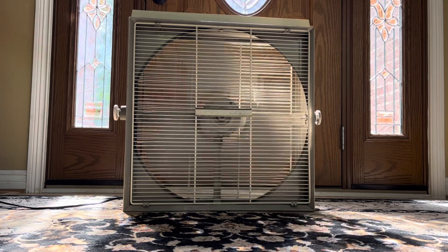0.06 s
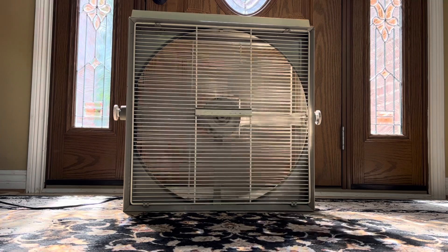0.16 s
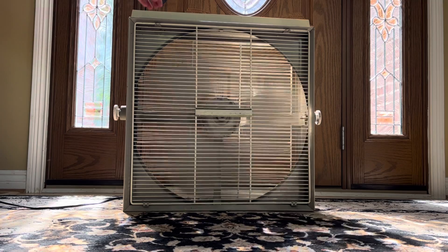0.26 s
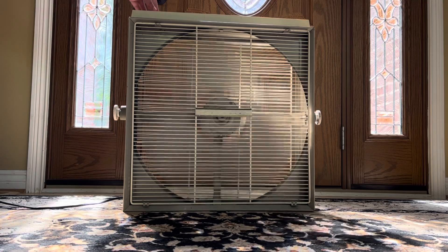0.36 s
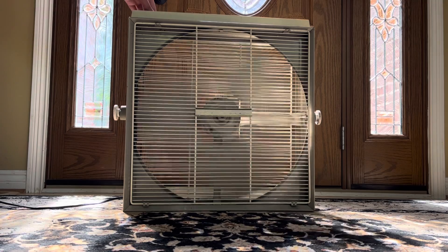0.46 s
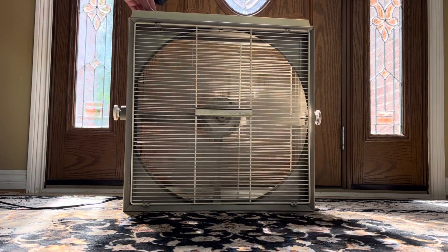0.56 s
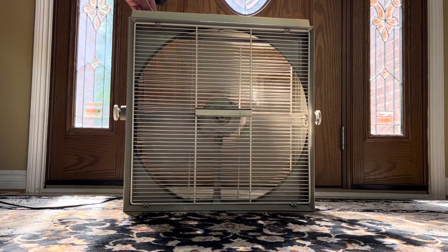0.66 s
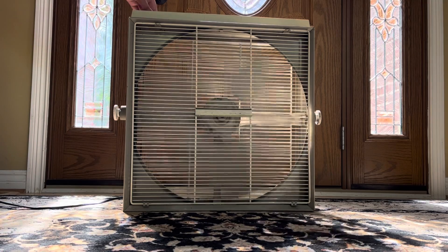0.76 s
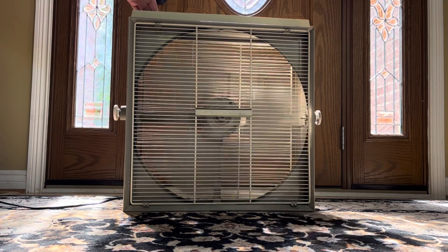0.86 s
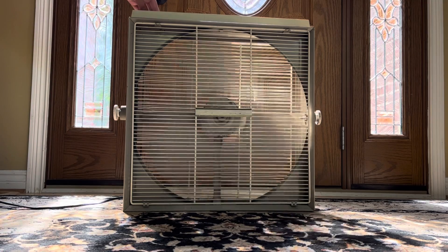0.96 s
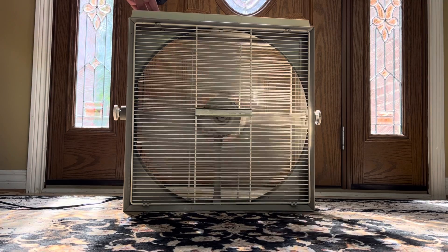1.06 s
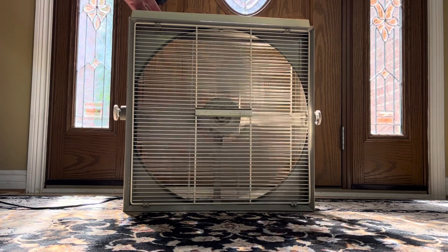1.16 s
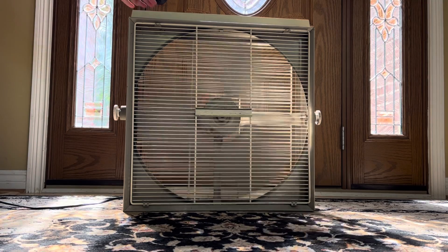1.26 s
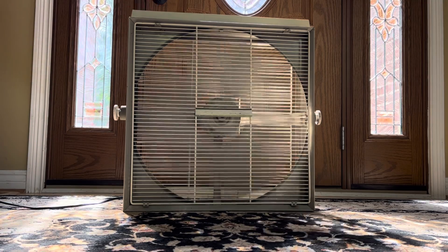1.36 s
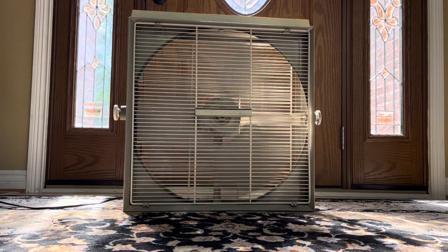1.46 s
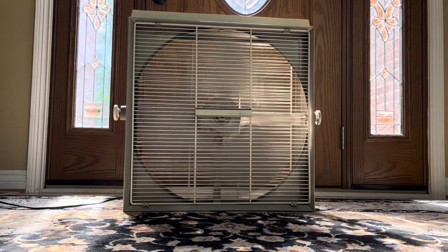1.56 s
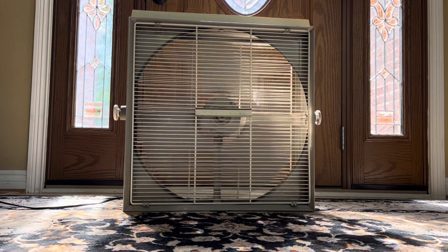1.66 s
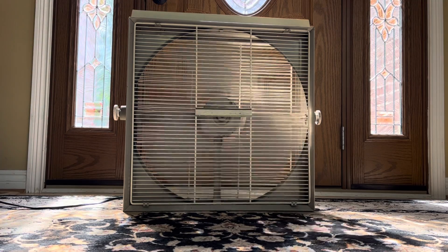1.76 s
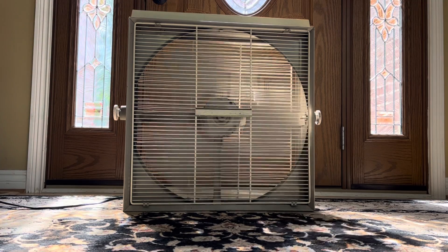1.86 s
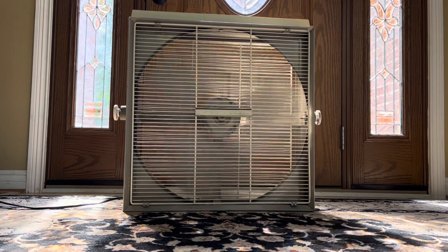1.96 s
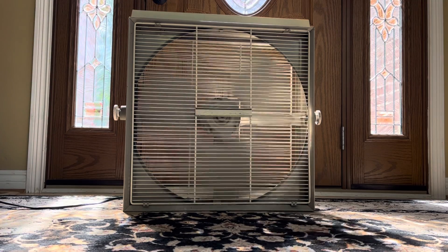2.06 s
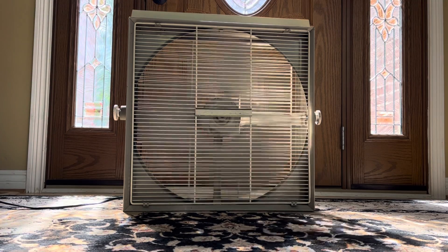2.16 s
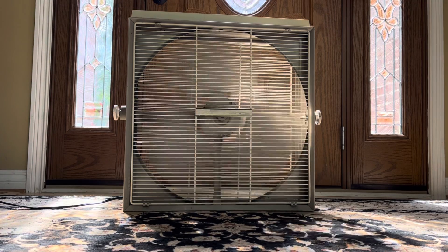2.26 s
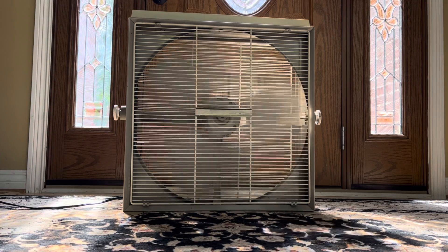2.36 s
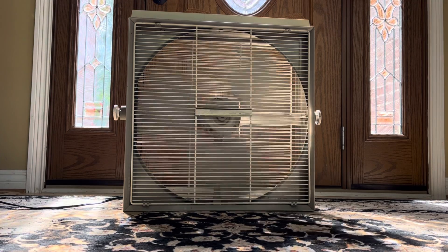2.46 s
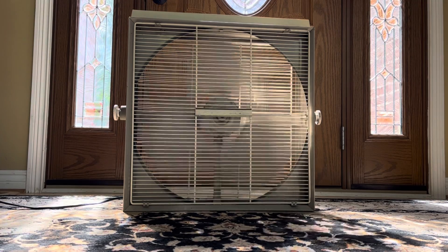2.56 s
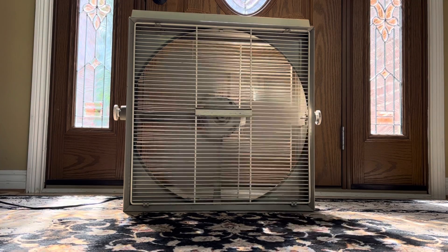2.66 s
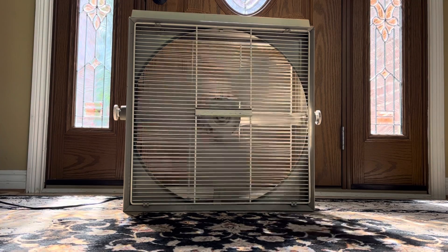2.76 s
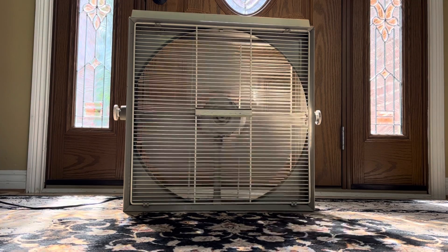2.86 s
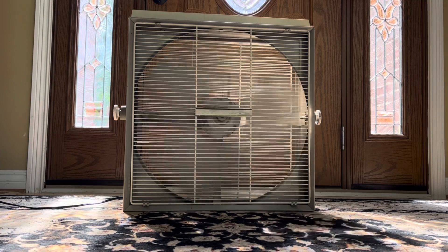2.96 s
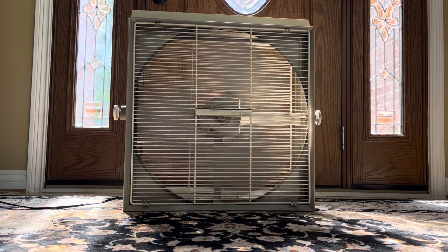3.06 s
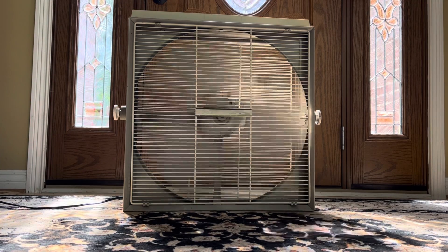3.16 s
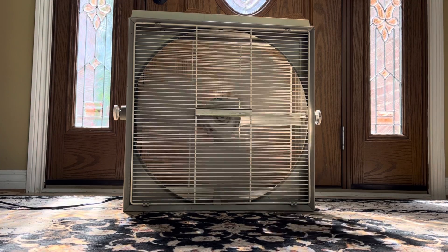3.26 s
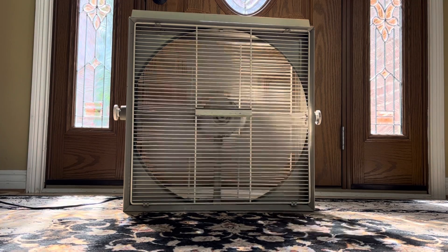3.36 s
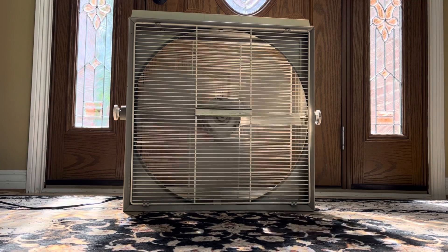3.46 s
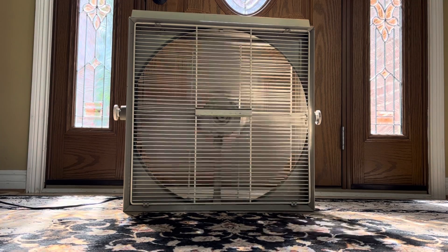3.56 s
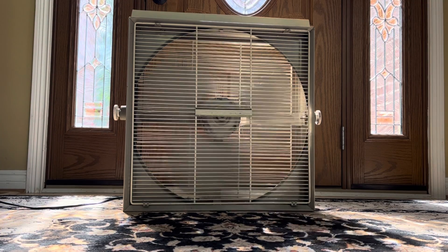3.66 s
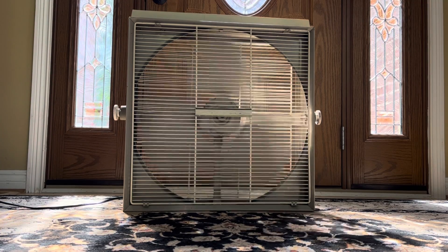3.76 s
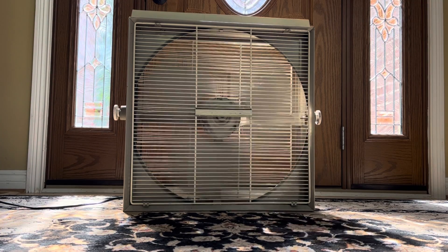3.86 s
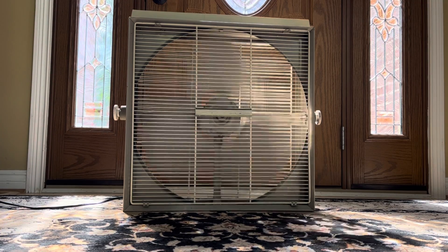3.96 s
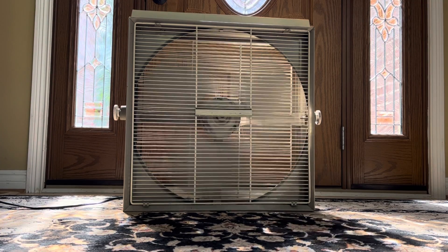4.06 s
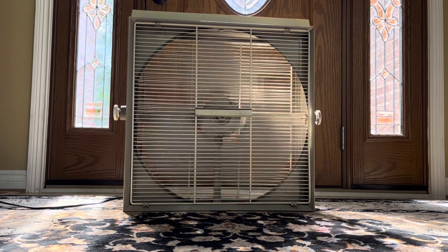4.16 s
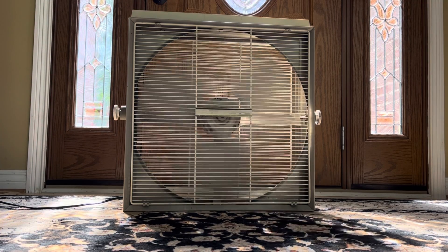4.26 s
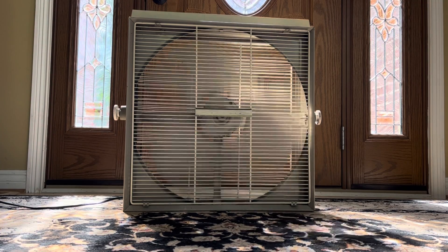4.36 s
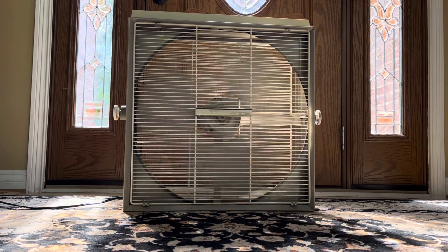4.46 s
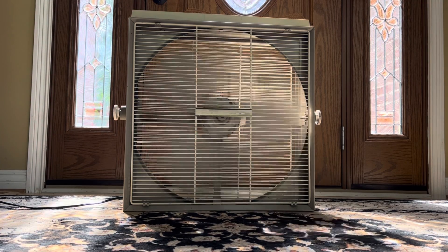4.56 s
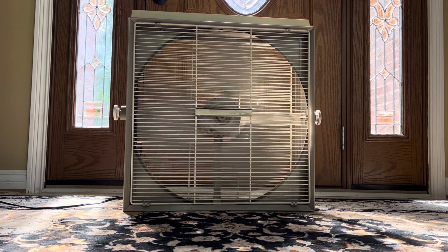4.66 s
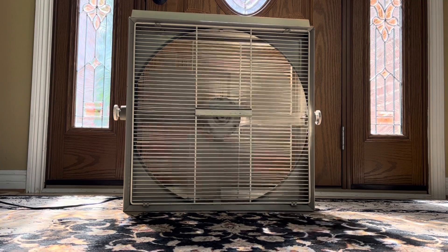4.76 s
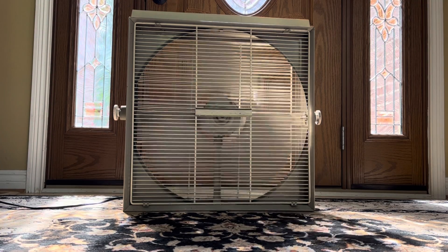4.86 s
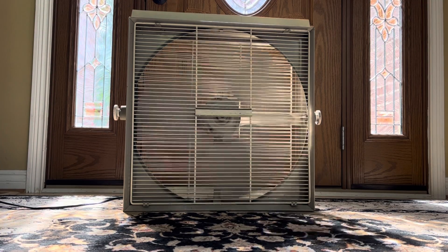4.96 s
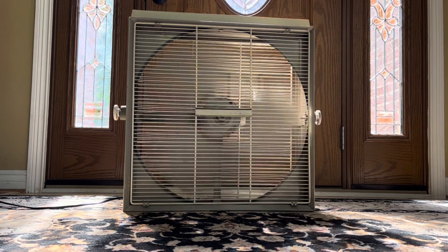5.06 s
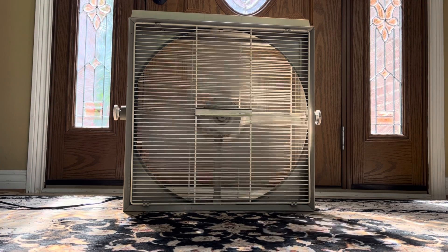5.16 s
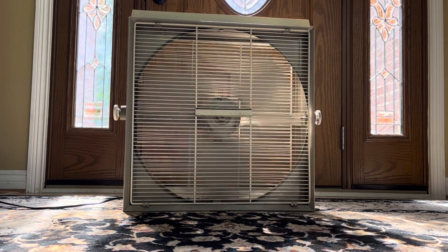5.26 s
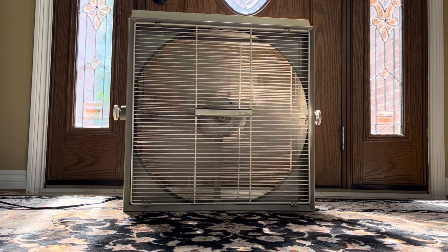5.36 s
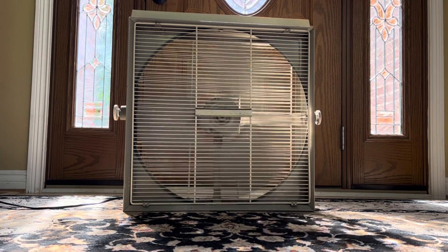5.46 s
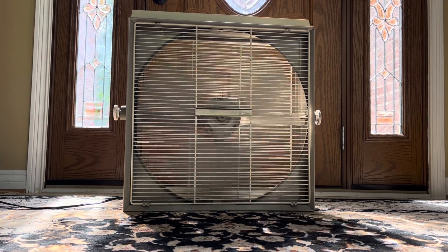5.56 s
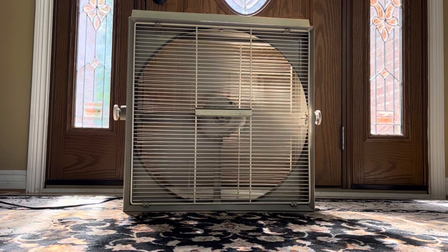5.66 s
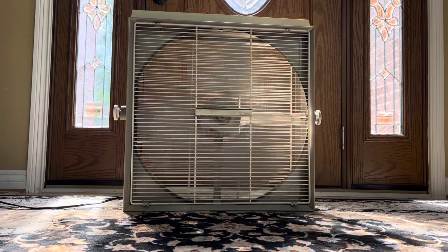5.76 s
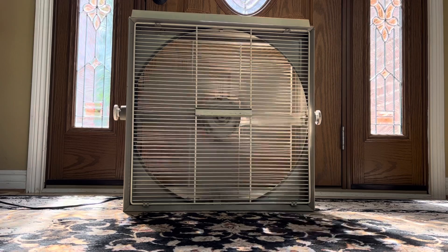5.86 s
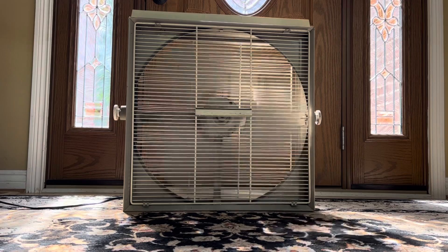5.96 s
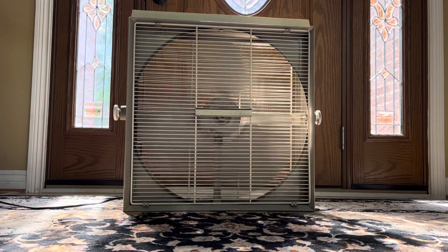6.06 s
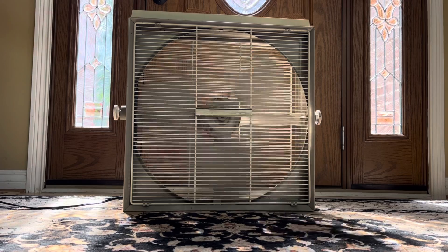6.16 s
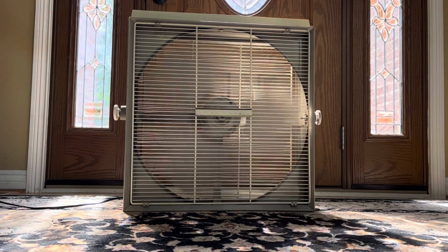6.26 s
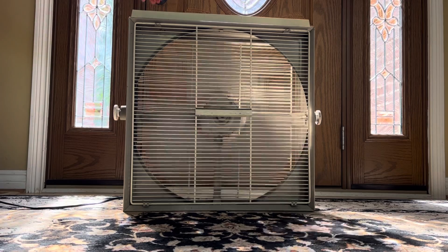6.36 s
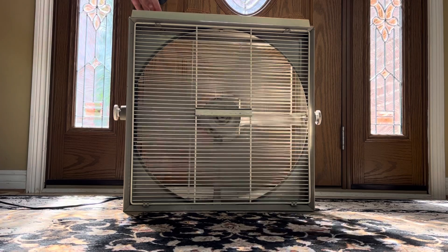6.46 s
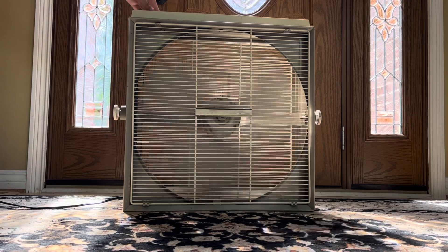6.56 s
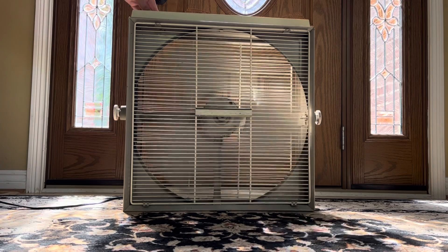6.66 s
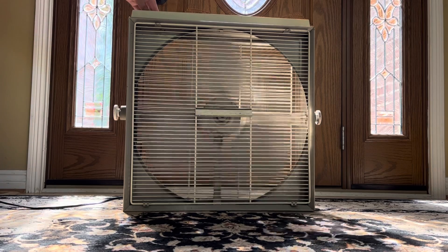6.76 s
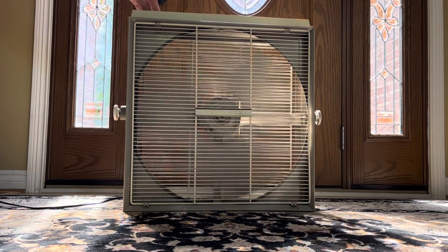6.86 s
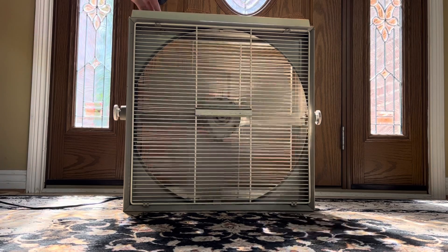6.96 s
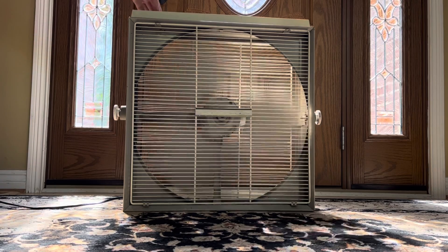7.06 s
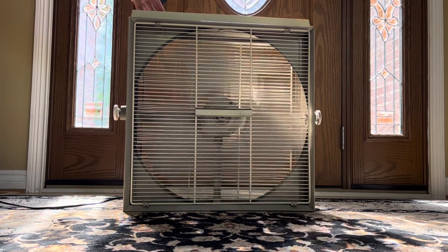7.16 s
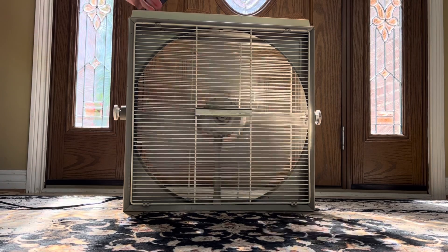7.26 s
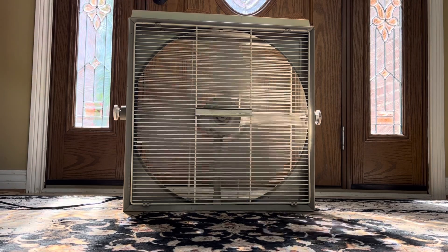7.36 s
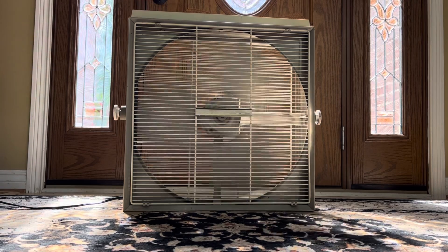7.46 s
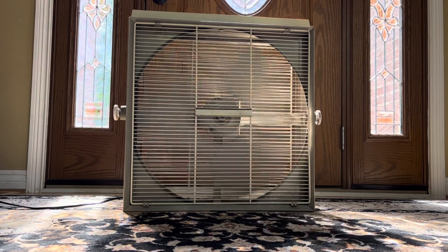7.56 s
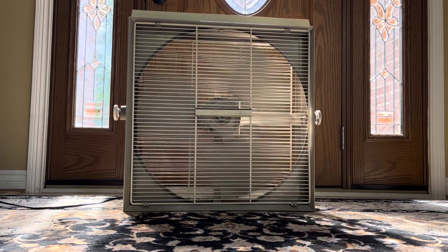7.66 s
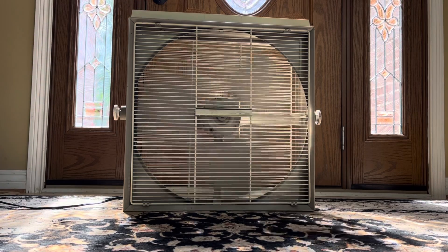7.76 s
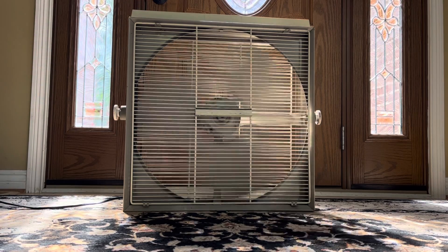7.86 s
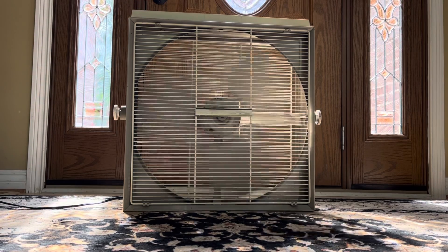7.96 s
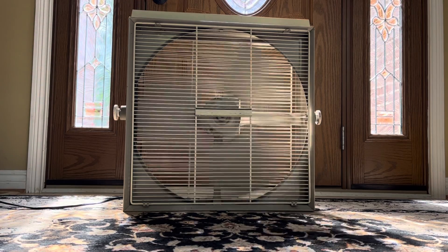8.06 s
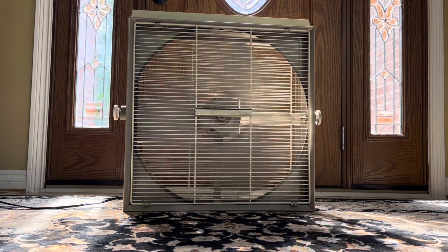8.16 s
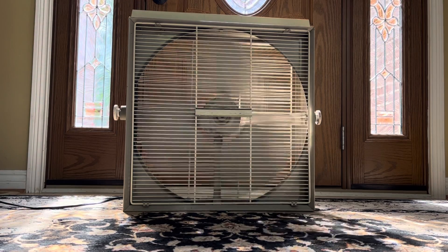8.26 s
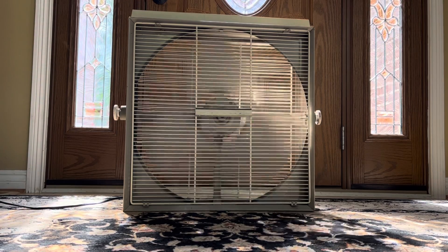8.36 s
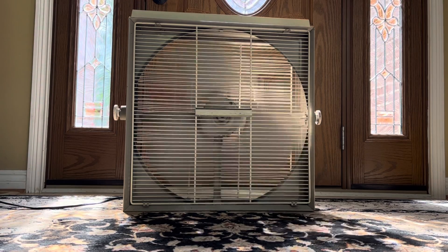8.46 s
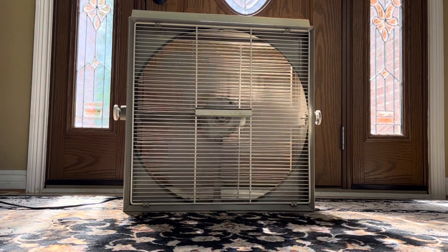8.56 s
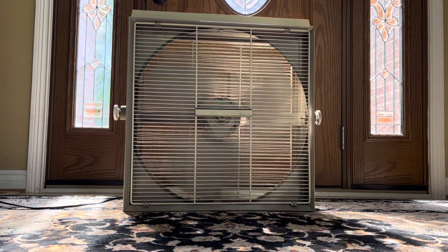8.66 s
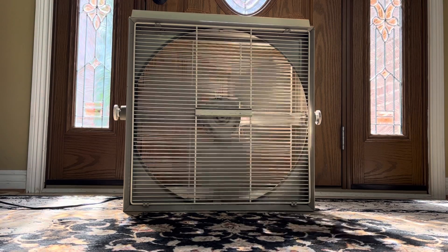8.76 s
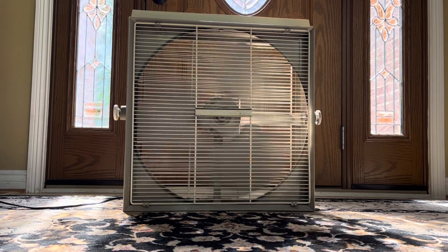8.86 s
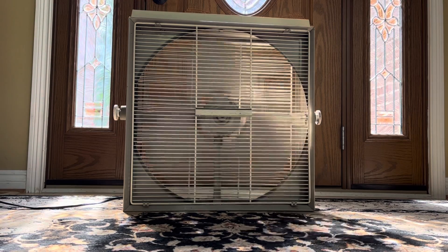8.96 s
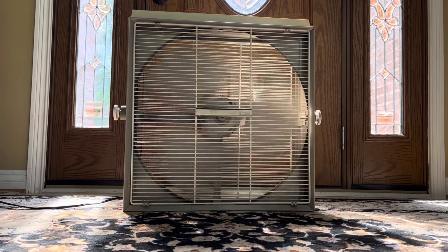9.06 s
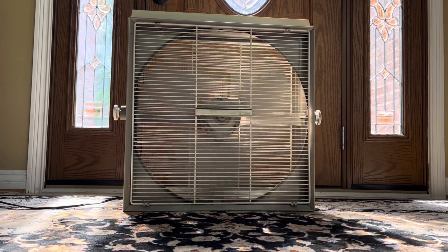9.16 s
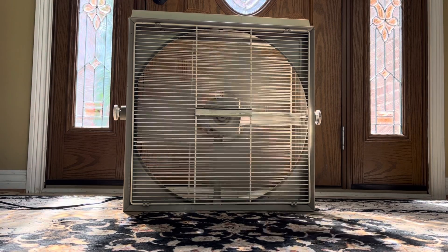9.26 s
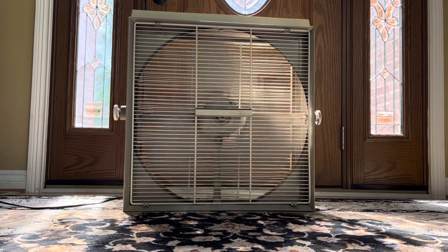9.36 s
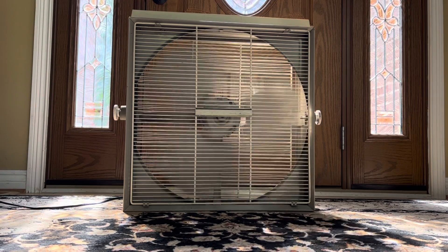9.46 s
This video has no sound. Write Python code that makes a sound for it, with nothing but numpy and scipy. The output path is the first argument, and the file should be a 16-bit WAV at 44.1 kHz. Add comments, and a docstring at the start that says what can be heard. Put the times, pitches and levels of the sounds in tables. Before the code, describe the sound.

Indoors, a large metal fan drones with a fluttery low hum under a soft, wide rush of air. Strong wind buffets open the scene, then irregular soft thumps come and go. The speed steps down early, easing lower and darker; late on, a hard double-snapping switch click rings briefly in the room before another slide downward. The microphone sits close, in the draught.

```python
"""In a hall, on a rug in front of a door, a metal box fan blows at a two-port microphone while slowing down:
its knob is turned down one step near the start and clicks again later. Locked harmonics of the blade rate
sink with the speed, and the rush of air, shaped noise with a door echo, darkens. The draught buffets the
ports with lumpy low noise and short gliding thumps; the clicks ring the modes of switch and case."""
import sys
import numpy as np
from scipy import signal
from scipy.fft import rfft, irfft
from scipy.io import wavfile
from scipy.ndimage import uniform_filter1d

SR = 44100
rng = np.random.default_rng(int(sys.argv[2]) if len(sys.argv) > 2 else 0)


def to_linear_factor(level_db):
    """Convert decibel levels (scalar or array-like) to linear amplitude factors."""
    exponent = np.asarray(level_db, float) / 20
    return 10 ** exponent


def dump_mix(stems):
    """Bounce the given channels to the path in sys.argv[1] as a 16-bit WAV at rate SR."""
    frames = np.atleast_2d(stems).T  # one column per channel
    limited = np.clip(frames, -1, 1)  # hard clip at full scale
    pcm = np.round(limited * 32767).astype(np.int16)
    wavfile.write(sys.argv[1], SR, pcm)


N = 419391

# Slowing of the fan: (t/s, mean blade passes f/Hz)
BLADE_RATE = [(0, 53.5), (.8, 53.4), (1.1, 51.2), (1.4, 49.5), (1.8, 48.4), (2.2, 47.6), (3, 46.2), (4, 45),
              (5, 44), (6, 43.1), (6.95, 42.4), (7.4, 41.3), (8, 40), (8.5, 39), (9, 37.9), (9.5, 37)]
FULL_SPEED = 53.5  # blade passes per second
# Blade tones at full speed, before the hall: (multiple of the blade rate, rms level/dB)
BLADE_TONES = [(1, -46.5), (2, -32), (3, -34), (4, -30.5), (5, -43.5), (6, -45.5), (7, -40), (8, -39.5),
               (9, -45.5)]
# Hall resonances that lift or sink the passing tones: (f/Hz, level/dB)
HALL_RESONANCES = [(40, -3), (76, -1), (84, 3.5), (89, 2.5), (105, -11), (115, 4.5), (123, -10), (130, 10),
                   (142, -1), (147, -4), (152, 1), (160, 4), (180, 3.5), (195, 3.5), (207, -9.5),
                   (214, -11), (240, -3), (272, 1.5), (280, -1.5), (290, -3), (296, -2), (308, -2),
                   (318, -6.5), (345, -14.5), (400, 0)]
# Rush of air at full speed: (f/Hz, relative level/dB, steepness/dB lost per dB of speed lost)
RUSH_COLOUR = [(25, -69.5, 14.5), (63.4, -46, 0.5), (150, -51, 1.5), (318, -49.5, 5.5), (428, -49.5, 3.5),
               (895, -61, 3), (1450, -71.5, 3.5), (1800, -71.5, 3), (2630, -73.5, 3), (3750, -79, 4.5),
               (5540, -89, 4.5), (8060, -94.5, 4.5), (10200, -100.5, 4.5), (13000, -103, 6),
               (16000, -111, 4.5)]
# The two ports: (f/Hz, lead of the right/rad, left over right level/dB, likeness 0 to 1)
PORT_RESPONSE = [(60, -.1, .5, .93), (600, 0, 1.2, .88), (1100, 0, 1.5, .75), (1600, .3, .5, .3),
                 (1680, -.03, .2, .97), (1900, -.06, .1, .98), (2600, -.5, .8, .89), (3600, -.63, 3.2, .62),
                 (4650, -.35, 2.4, .76), (5200, .2, 2.3, .62), (5700, 1, 2.2, .62), (6700, 1.5, 2, .69),
                 (7300, 2.1, .8, .72), (8300, 3.14, 0, .9), (9800, 4.6, -.3, .55), (10800, 5.9, 0, .8),
                 (12000, 6.28, 0, .9), (13300, 6.9, 0, .6), (14000, 8.5, 0, .5), (15200, 9.42, 0, .9)]
# Slow course of the draught: (t/s, relative level/dB under 115 Hz, tilt/dB per octave above 60 Hz)
DRAUGHT_COURSE = [(0, -22, -7), (.14, -30, -7), (.22, -30, -13), (.3, -28, -9), (.5, -39, -4),
                  (.9, -38.5, -9), (1.25, -34, -10), (1.6, -37, -3), (2.05, -37.5, -1), (2.25, -28.5, -8),
                  (2.7, -35.5, -5), (3.15, -37, -1.5), (3.4, -28.5, -8.5), (3.8, -22.5, -10),
                  (4.15, -33.5, -15), (4.55, -25.5, -7.5), (5.05, -27, -10.5), (5.2, -35, -10),
                  (5.35, -24, -10), (5.6, -29.5, -17.5), (5.87, -23.5, -8.5), (6.05, -32, -7),
                  (6.5, -26, -10), (6.85, -28, -7), (7.1, -19.5, -16), (7.5, -23, -10.5),
                  (7.9, -39.5, -8.5), (8.2, -29.5, -7), (8.55, -41.5, -3.5), (8.72, -28, -7.5),
                  (8.88, -39, -7.5), (9.1, -29, -8.5), (9.28, -30, -6), (9.42, -26, -13), (9.5, -35, -6)]
# Strongest eddies at the ports: (t/s, nominal peak level/dB, middle f/Hz, length/cycles, glide/octaves)
EDDY_THUMPS = [(0.056, -7, 173, 3.9, -1), (0.118, -10, 220, 1.96, -3), (0.176, -12.5, 266, 2.4, -1.5),
               (0.186, -13, 215, 4.4, -0.5), (0.195, -13, 79, 1.9, 1), (0.22, -12.5, 221, 3, 0.2),
               (0.236, -20, 90, 2.2, -1), (0.296, -14, 209, 2.1, -1.4), (0.6, -13, 420, 4, -.5),
               (0.601, -14, 260, 3.5, -.6), (0.618, -12, 115, 2.6, -1), (0.8045, -7, 200, 3.2, -2.6),
               (0.826, -17, 62, 1.6, -.5), (0.828, -9, 260, 1.6, -1.5), (1.058, -17.5, 100, 2.2, 0.5),
               (1.179, -13, 150, 2.1, -1), (1.296, -17, 80, 1.8, 0), (2.258, -14.5, 150, 3.5, -2),
               (2.9, -17, 188, 3.87, -2), (3.051, -13, 130.5, 2.7, -0.6), (3.063, -10, 184.4, 2.6, -0.6),
               (3.334, -13, 140, 2, 0), (3.346, -11, 210, 1.5, -.5), (3.351, -7.5, 115, 2.7, -.2),
               (3.36, -17, 280, 2.5, 0), (3.781, -15, 171, 5.8, -1.2), (3.909, -16, 146, 3.8, 1),
               (5.055, -17, 110, 5.1, -.5), (5.297, -16, 86, 3.5, -1.5), (5.823, -10.5, 105, 2.5, -1),
               (5.844, -14, 120, 1.5, -1), (5.857, -13, 270, 2, -1), (5.866, -14, 290, 2, -.3),
               (5.871, -8.5, 112, 2.4, -.5), (5.894, -11, 105, 1.2, -.3), (7.169, -17, 198, 2.2, -2.5),
               (7.282, -18.5, 184, 2.3, -1), (7.483, -20, 112, 4.3, -1.3), (8.6975, -21, 480, 2.2, -.4),
               (8.6995, -17.5, 310, 4, -.3), (9.189, -22, 150, 1.9, -1.5), (9.4, -16, 87, 4.1, -1.5)]
# Quick ticks as the knob snaps over: (t/s, dry peak level/dB, tilt/dB per octave about 4 kHz)
KNOB_TICKS = [(7.008, -26, 0), (7.0118, -22, -7), (7.0145, -33, 0), (7.018, -36, -2), (7.022, -35, -7),
              (7.027, -35, -9), (7.038, -48, 0), (7.046, -47, 0), (7.057, -51, -1), (7.07, -51, -1),
              (7.128, -50, -2)]
# Ringing modes of switch and case, before the tilt: (f/Hz, level/dB, t60/s)
KNOB_MODES = [(1600, -8, .01), (1900, -5, .01), (2370, -2, .01), (2750, 2, .012), (3400, -7, .006),
              (4250, 5, .012), (4560, 2, .009), (5300, -6, .005), (6000, -7, .006), (6600, -4, .008),
              (7300, -10, .005), (9300, -6, .006), (10000, -8, .005), (10750, -7, .008), (11500, -8, .006),
              (12400, -11, .004), (13700, -8, .006)]
# Silent treble bands in the sum of the two channels: (from f/Hz, to f/Hz)
SUM_SILENCES = [(7620, 8950), (14450, 20000)]
# Silent treble bands in the difference of the two channels: (from f/Hz, to f/Hz)
DIFFERENCE_SILENCES = [(11030, 13050)]


def evened(x):
    """Scales to rms 1."""
    return x / np.sqrt(np.mean(x ** 2) + 1e-20)


def over_frequency(table, hz):
    """Columns of a table, joined on a log frequency axis."""
    f, *columns = np.transpose(table)
    return [np.interp(np.log(hz + 1), np.log(f + 1), c) for c in columns]


def over_time(table, t):
    """Columns of a curve at times t."""
    s, *columns = np.transpose(table)
    return [np.interp(t, s, c) for c in columns]


def add(mix, s, sound):
    """Mixes a sound in at second s, cut short at the end of the mix."""
    part = mix[:, round(s * SR):][:, :sound.shape[1]]
    part += sound[:, :part.shape[1]]


def noise_grid(size):
    """Times, frequencies and two fields of complex noise for short-time spectra."""
    frames = N // (size // 4) + 5
    a, b, c, d = rng.standard_normal((frames, size // 2 + 1, 4)).T
    t = np.arange(frames) * size / 4 / SR
    return t, np.fft.rfftfreq(size, 1 / SR), a + 1j * b, c + 1j * d


def patches(shape, bins, frames):
    """A smooth random field of rms 1 over frequency and time."""
    field = rng.standard_normal(shape[::-1]).T
    field = uniform_filter1d(field, bins, 0)
    return evened(uniform_filter1d(field, frames, 1))


def sound_of(spectra):
    """Inverse short-time transform at 75 % overlap."""
    size = 2 * (spectra.shape[-2] - 1)
    return signal.istft(spectra, nperseg=size, noverlap=size * 3 // 4)[1][..., :N]


def at_ports(hz, direct, diffuse):
    """The right port hears the direct sound turned in phase, mixed with unrelated sound."""
    lead, pan_db, same = (c[:, None] for c in over_frequency(PORT_RESPONSE, hz))
    same = np.clip(same, 0, 1)
    right = same * np.exp(1j * lead) * direct + np.sqrt(1 - same ** 2) * diffuse
    return np.array([direct * to_linear_factor(pan_db / 2), right * to_linear_factor(-pan_db / 2)])


def draught():
    """Lumpy rumble common to both ports, plus smaller eddies that push the ports apart."""
    top_hz, low_hz, low_order, lumpy_db = 450, 48, 1.1, 3.5
    gusts_db, darker_per_db = 1.6, 0.56  # a stronger gust is duller: dB per octave for each dB
    own_db, own_gusts_db, own_lumpy_db = -37, 5, 2  # eddies at single ports come and go at random
    own_hz, own_octaves = 110, 0.85
    t, hz, shared, own = noise_grid(size=2048)
    f = hz[:, None]

    level_db, tilt_db = over_time(DRAUGHT_COURSE, t)
    gust, own_gust = patches((2, len(t)), bins=1, frames=5)
    level_db = level_db + gusts_db * gust
    tilt_db = tilt_db - darker_per_db * gusts_db * gust

    octaves = np.log2(np.maximum(f, 60) / 60)
    shape = to_linear_factor(tilt_db * octaves) / np.sqrt(1 + (low_hz / (f + 1)) ** (2 * low_order))
    shape = shape / (1 + (f / top_hz) ** 4)  # eddies are slow: the treble fades away
    low_band = np.sqrt((shape[hz < 115] ** 2).sum(0))
    shape = shape / low_band * to_linear_factor(level_db)
    shared = shared * shape * to_linear_factor(lumpy_db * patches(shared.shape, bins=6, frames=3))

    hump = np.exp(-.5 * (np.log2((f + 1) / own_hz) / own_octaves) ** 2)
    own_lumps_db = own_lumpy_db * patches(own.shape, bins=6, frames=3)
    own = own * hump / np.linalg.norm(hump) * to_linear_factor(own_db + own_gusts_db * own_gust + own_lumps_db)
    return sound_of(np.array([shared + own, shared - own]))


def thump(db, hz, cycles, glide):
    """One eddy rolling over the ports: a few gliding cycles, quick to rise and slower to fade."""
    skew, soft, pan_db = 0.61, 1.2, 2.5  # every thump leans left
    u = np.linspace(0, 1, round(np.clip(cycles, 1, 9) * SR / hz))
    turns = np.cumsum(hz * 2 ** (glide * (u - .5))) / SR
    swell = abs(np.sin(np.pi * u ** skew)) ** soft
    wave = to_linear_factor(db) * swell * np.sin(2 * np.pi * turns)
    return wave * to_linear_factor(np.array([[pan_db / 2], [-pan_db / 2]]))


def knob():
    """Each tick is a snap and a short scrape that ring the modes of the switch and case; the hall answers."""
    crack_s, scrape = 0.0015, .15
    tail_db, tail_t60 = -8, 0.3  # t60 in seconds
    t, out = np.arange(SR // 2) / SR, np.zeros((1, N))
    for s, db, tilt_db in KNOB_TICKS:
        ring = np.zeros(len(t))
        for hz, mode_db, t60 in KNOB_MODES:
            decay = to_linear_factor(mode_db + tilt_db * np.log2(hz / 4000) - 60 * t / t60)
            ring += decay * np.sin(2 * np.pi * hz * t)
        strike = (t == 0) + scrape * rng.standard_normal(len(t)) * np.exp(-t / crack_s)
        tick = signal.oaconvolve(ring, strike)
        add(out, s, to_linear_factor(db) * tick[None] / abs(tick).max())

    tails = rng.standard_normal((len(t), 2)).T * to_linear_factor(-60 * t / tail_t60)
    tails = tails / np.linalg.norm(tails[0])
    wet, other = to_linear_factor(tail_db) * signal.oaconvolve(out, tails, axes=1)[:, :N]
    hz = np.fft.rfftfreq(N, 1 / SR)
    spectra = at_ports(hz, rfft(out[0] + wet)[:, None], rfft(other)[:, None])
    return irfft(spectra[..., 0], N)


def rush():
    """Turbulence off blades and grille, its level falling with fan speed at a frequency-dependent rate."""
    gain_db, patchy_db, flutter_db = 15.5, .8, .5
    echo_s, echo, echo_hz = 0.003222, 0.39, 1500
    t, hz, direct, diffuse = noise_grid(size=1024)
    slowed_db = 20 * np.log10(over_time(BLADE_RATE, t)[0] / FULL_SPEED)
    colour_db, steepness = over_frequency(RUSH_COLOUR, hz)
    # the back of the fan radiates inverted and the door returns it: a comb
    reflection = echo / (1 + (hz / echo_hz) ** 4)
    comb = abs(1 - reflection * np.exp(-2j * np.pi * hz * echo_s))
    field_db = colour_db[:, None] + steepness[:, None] * slowed_db
    field_db = field_db + patchy_db * patches(direct.shape, bins=14, frames=6)
    field_db = field_db + flutter_db * patches(direct.shape, bins=200, frames=4)
    return to_linear_factor(gain_db) * sound_of(at_ports(hz, direct, diffuse) * to_linear_factor(field_db) * comb[:, None])


def blades():
    """One pulse per blade pass, as in-step harmonics, each wavering in the turbulent inflow."""
    steepness = 2.28  # dB lost per dB of speed lost
    waver_db, jitter, pan_db = 1.0, .001, .6  # jitter as a share of the rate
    n = np.arange(N)
    rate = over_time(BLADE_RATE, n / SR)[0]
    steps, out = np.arange(0, N + 441, 441), np.zeros(N)  # one random step per 10 ms
    wander = patches((len(BLADE_TONES), len(steps)), bins=1, frames=12)
    drift = patches((1, len(steps)), bins=1, frames=8)[0]
    turns = np.cumsum(rate * (1 + jitter * np.interp(n, steps, drift))) / SR
    slowed_db = 20 * np.log10(rate / FULL_SPEED)
    for (k, db), waver in zip(BLADE_TONES, wander):
        level_db = db + steepness * slowed_db + over_frequency(HALL_RESONANCES, k * rate)[0]
        level_db = level_db + waver_db * np.interp(n, steps, waver)
        out += np.sqrt(2) * to_linear_factor(level_db) * np.cos(2 * np.pi * k * turns)
    return out * to_linear_factor(np.array([[pan_db / 2], [-pan_db / 2]]))


def scene():
    """Draught, knob and fan together, with the thumps laid in."""
    mix = draught() + knob() + rush() + blades()
    for s, *eddy in EDDY_THUMPS:
        add(mix, s, thump(*eddy))
    return mix


def top_cut(x):
    """Nothing passes above the cut-off."""
    return signal.sosfilt(signal.butter(12, 15720, fs=SR, output="sos"), x)


def record(dry):
    """The microphone's low cut, silent bands in sum and difference, and a short closing fade."""
    cut_hz = 44
    mirrored = np.hstack([dry, dry[:, ::-1]])  # so the silent bands do not ring at the ends
    hz, (left, right) = np.fft.rfftfreq(2 * N, 1 / SR), rfft(mirrored)
    both, apart = (left + right) / 2, (left - right) / 2
    for part, silences in ((both, SUM_SILENCES), (apart, DIFFERENCE_SILENCES)):
        for lo, hi in silences:
            part[(hz > lo) & (hz < hi)] = 0
    low_cut = 1 / np.sqrt(1 + (cut_hz / (hz + 1)) ** 8)
    paired = irfft(np.array([both + apart, both - apart]) * low_cut)[:, :N]
    finished = paired * np.minimum(np.arange(N)[::-1] / 150, 1)  # keeps the end from clicking
    return top_cut(finished)


dry = scene()
out = record(dry)
dump_mix(out)
```